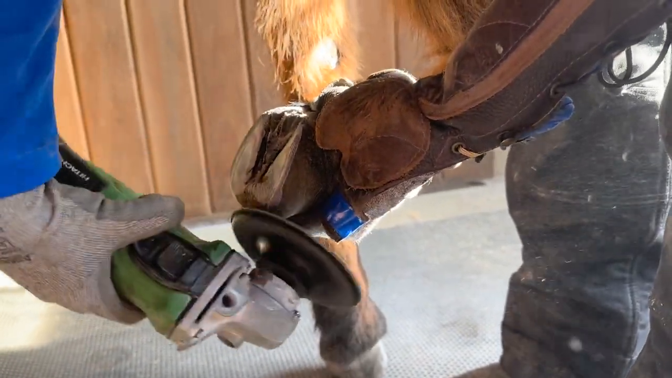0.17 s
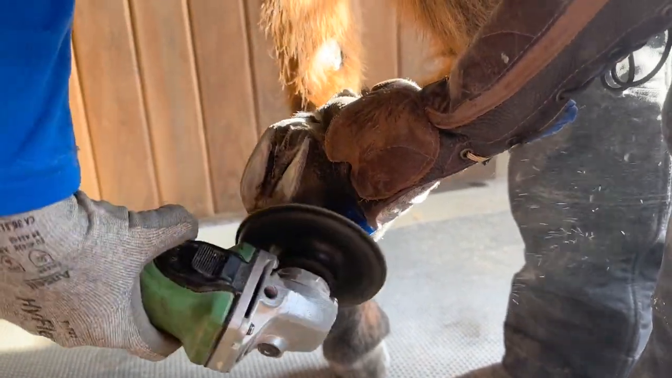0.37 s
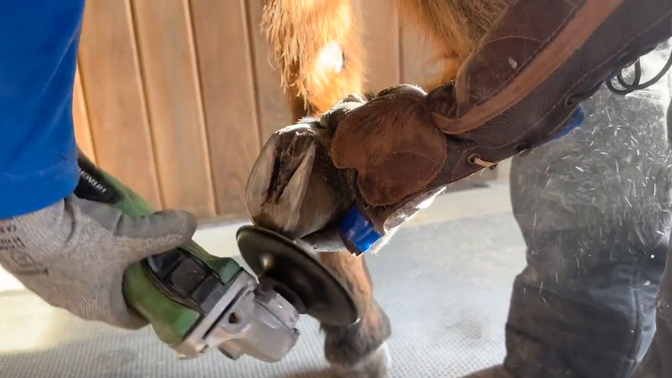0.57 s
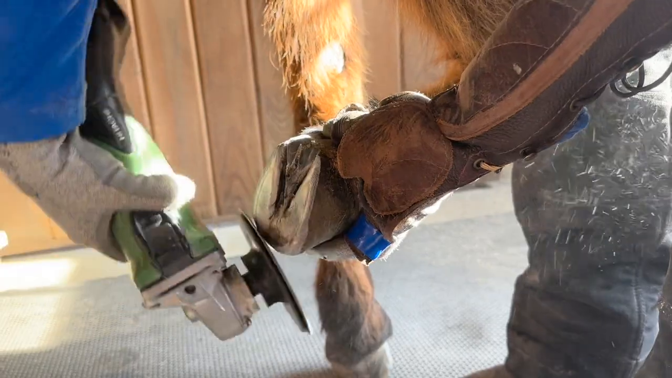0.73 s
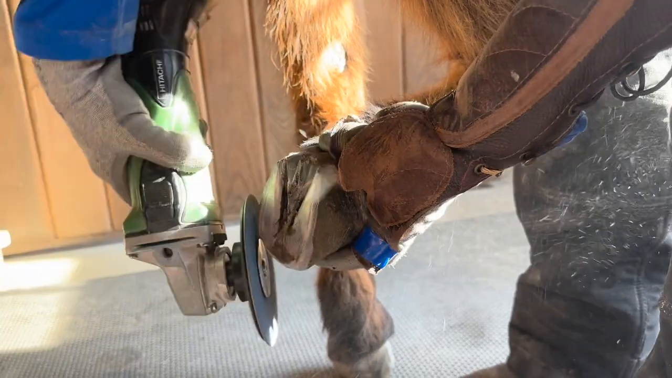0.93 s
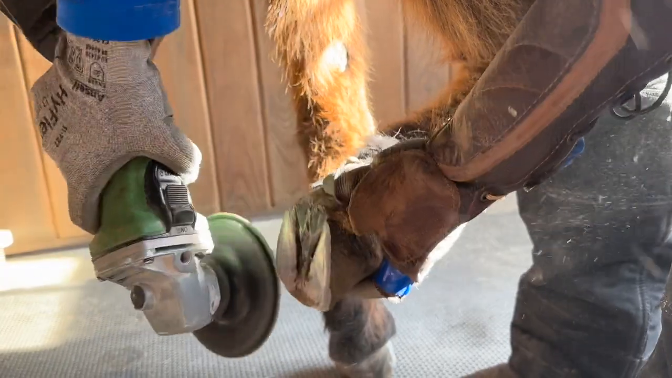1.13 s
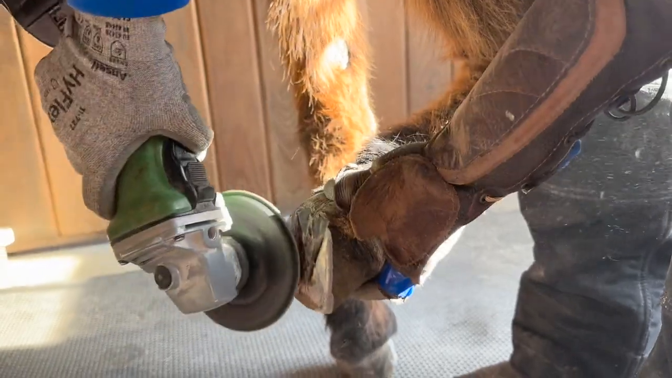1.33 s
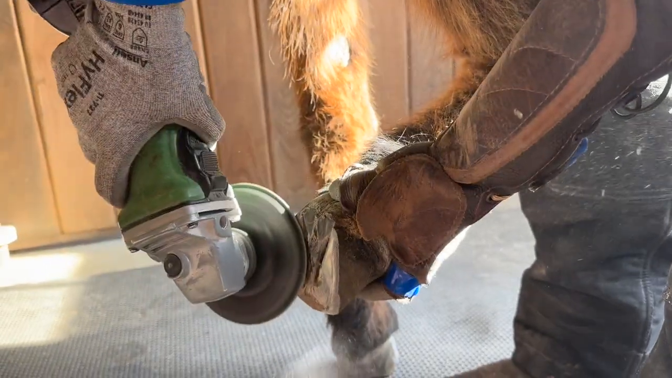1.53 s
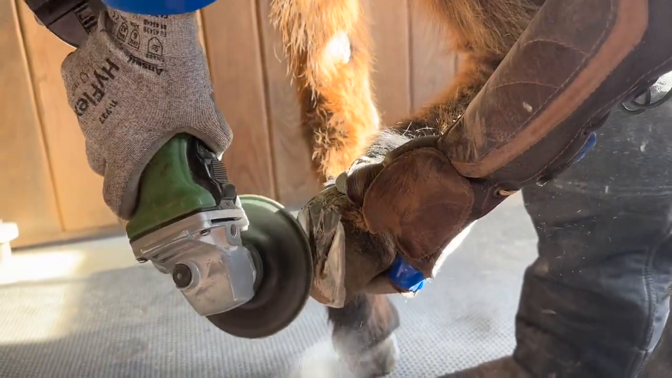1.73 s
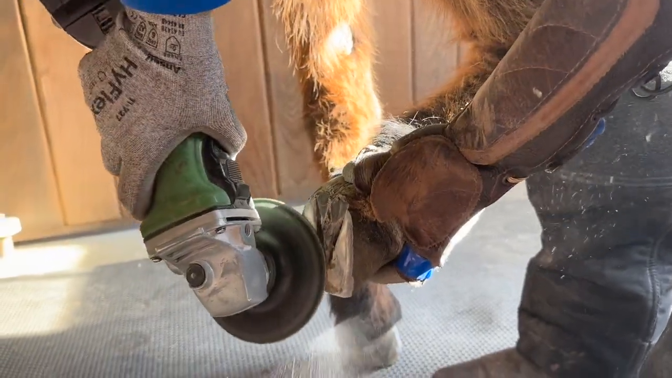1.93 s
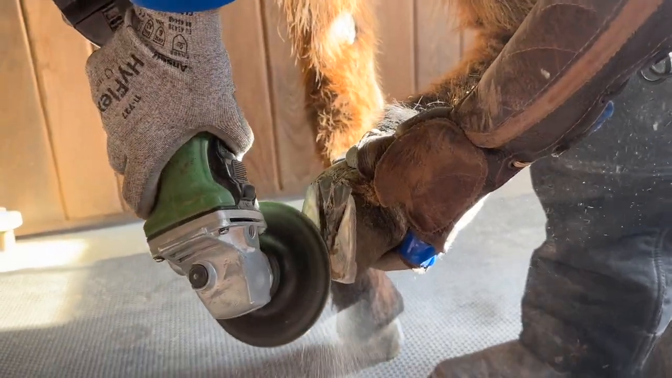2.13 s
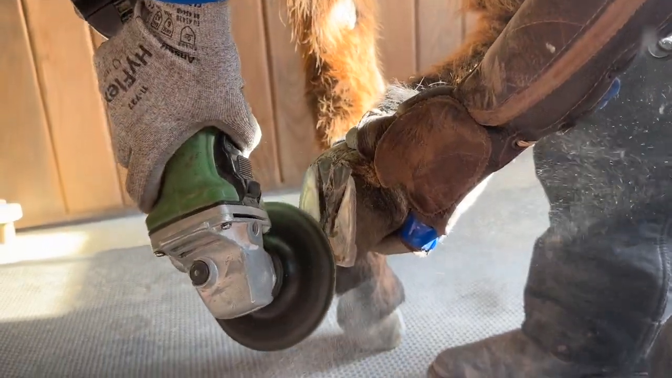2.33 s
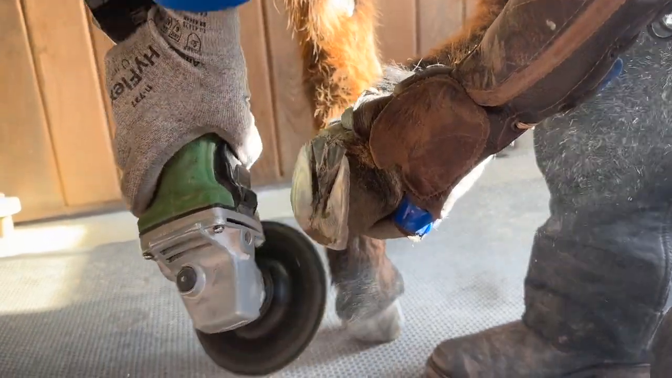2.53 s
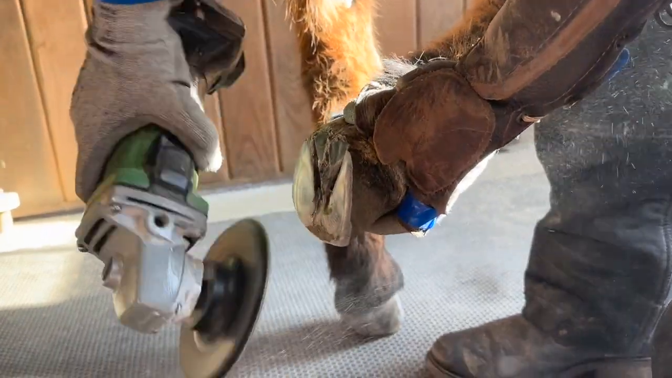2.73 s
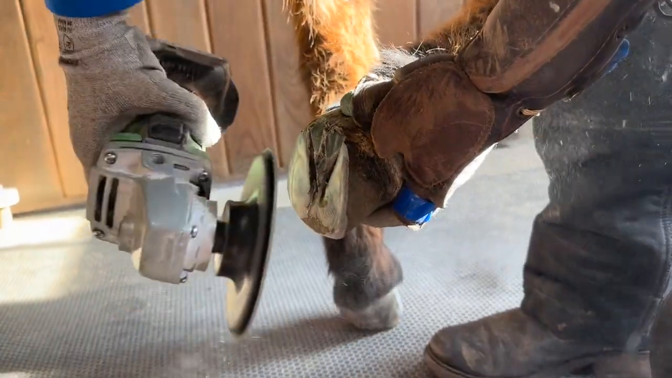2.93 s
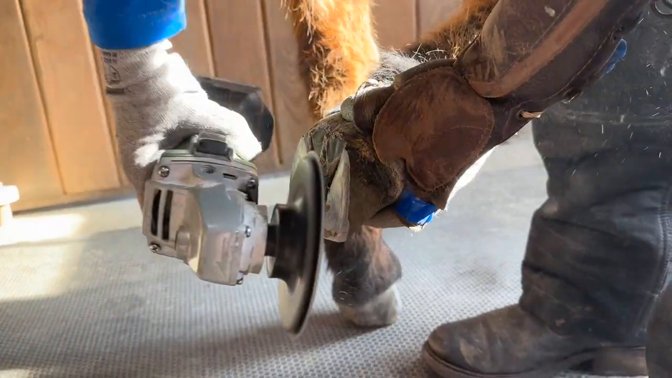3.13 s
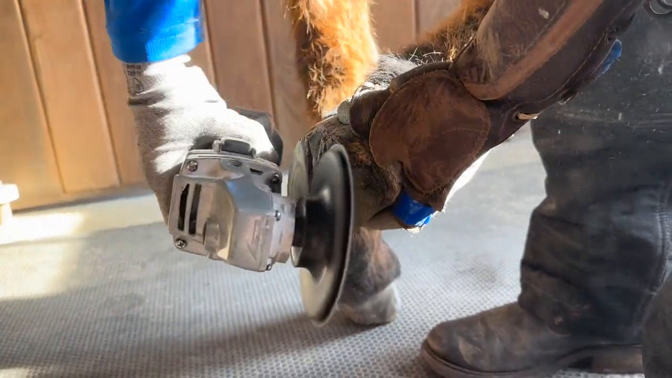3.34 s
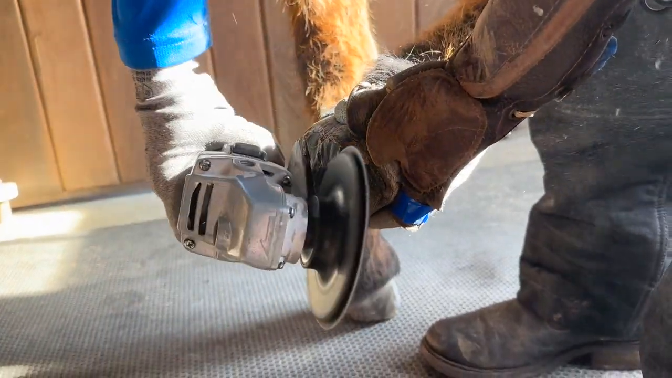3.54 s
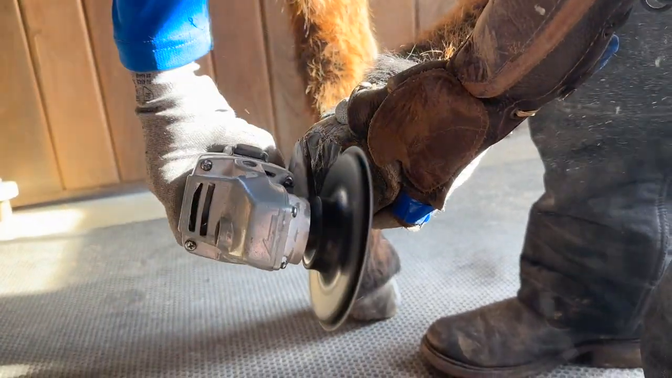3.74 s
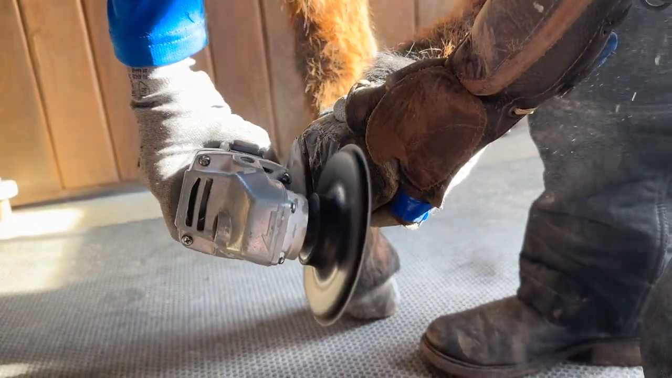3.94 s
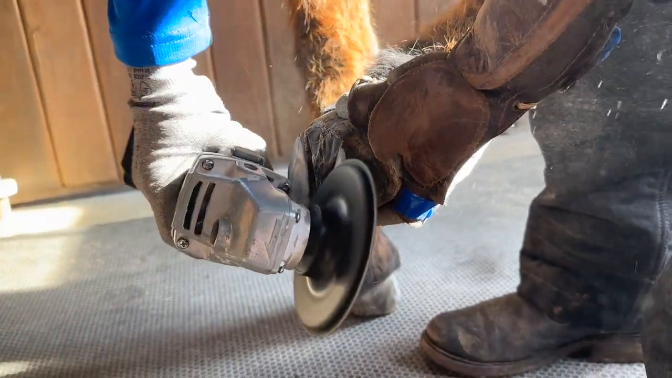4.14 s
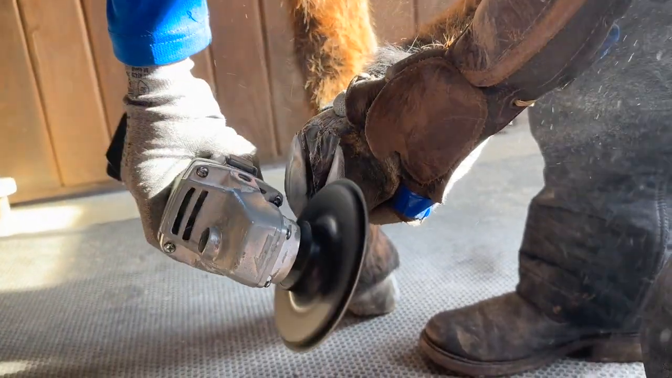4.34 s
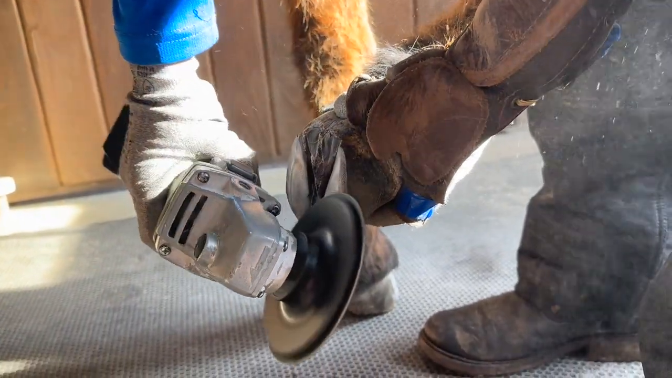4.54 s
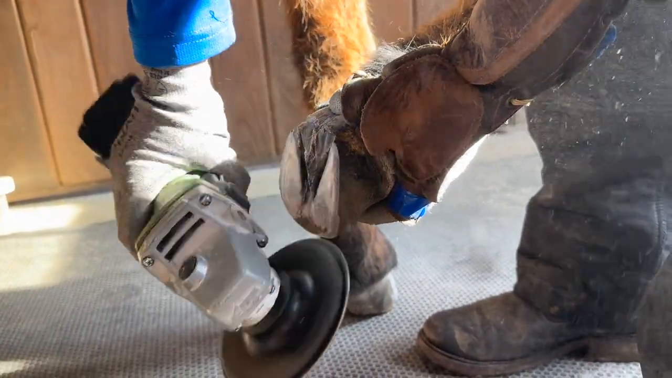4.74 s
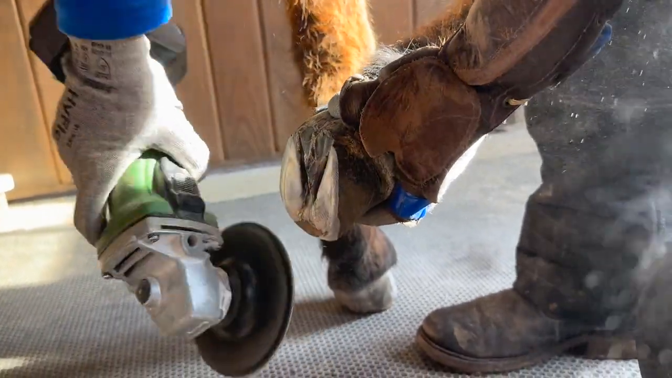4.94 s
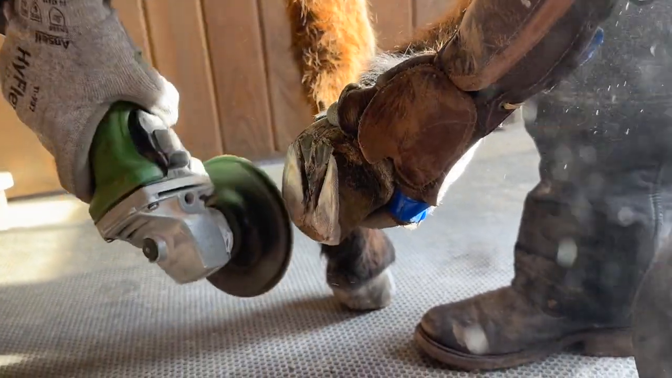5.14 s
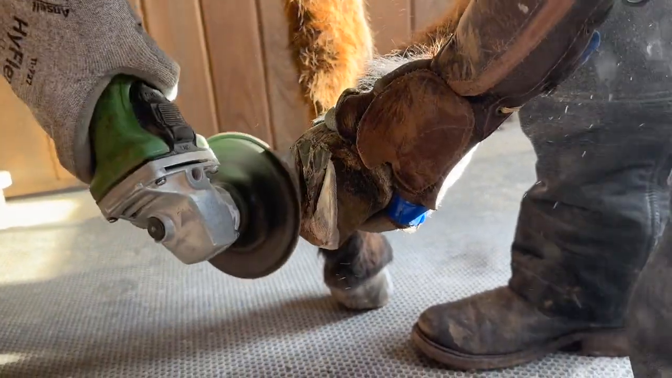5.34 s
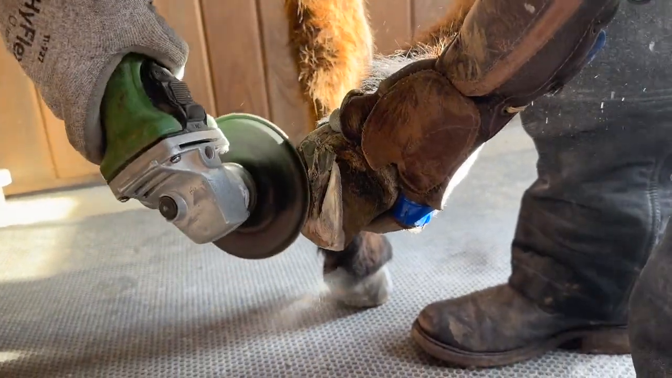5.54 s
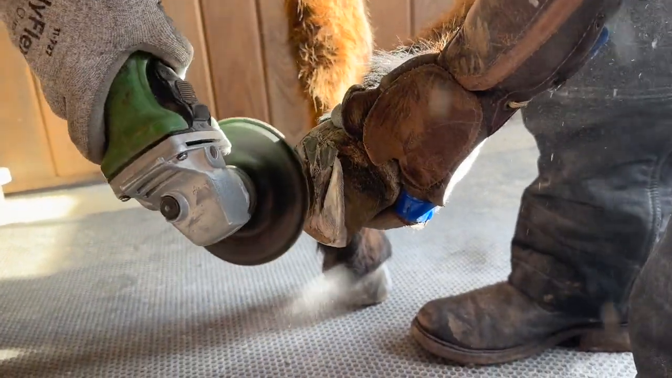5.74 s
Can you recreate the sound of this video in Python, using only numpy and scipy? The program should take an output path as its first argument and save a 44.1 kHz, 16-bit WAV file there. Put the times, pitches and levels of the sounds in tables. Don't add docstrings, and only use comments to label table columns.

```python
import sys
import numpy as np
from scipy import signal
from scipy.fft import rfft, irfft, next_fast_len
from scipy.io import wavfile
from scipy.ndimage import uniform_filter1d, map_coordinates

SR = 44100
rng = np.random.default_rng(int(sys.argv[2]) if len(sys.argv) > 2 else 0)


def volts(x):
    e = np.asarray(x, float) / 20
    return 10 ** e


def bounce(signal):
    frames = np.transpose(np.atleast_2d(signal))
    limited = np.clip(frames, -1, 1)
    pcm = np.round(limited * 32767).astype(np.int16)
    wavfile.write(sys.argv[1], SR, pcm)


N = 259749

# time in seconds, turns per second in Hz.
SPINDLE_SPEED = [(0.0, 142.6), (0.36, 140.5), (0.53, 146.7), (0.73, 144), (0.9, 146.3), (1.06, 142.4),
                 (1.15, 153.1), (1.5, 154.8), (1.7, 142.8), (2.02, 132.8), (2.5, 128.1), (2.72, 150.3),
                 (3.5, 155.5), (3.95, 147.8), (4.27, 134.2), (4.72, 131.4), (5.4, 155.9), (5.84, 136.6)]
# time in seconds, level of the grit hiss in dB.
STROKES = [
    [(0.0, -26.5), (0.25, -26.5), (0.4, -32.5), (0.47, -29.5), (0.6, -25), (0.75, -30.5), (0.86, -26),
     (0.92, -28), (0.98, -46)],
    [(1.38, -50), (1.4, -44), (1.54, -29.5), (1.66, -30.5), (1.74, -34), (1.79, -26.5), (1.9, -29),
     (2.5, -23.5), (2.56, -49)],
    [(3.4, -54), (3.456, -27), (3.506, -40), (3.54, -28.5), (3.68, -28.5), (3.77, -38), (4.09, -28),
     (4.68, -24), (4.75, -38.5)],
    [(5.4, -89), (5.428, -24.5), (5.45, -32.5), (5.62, -30.5), (5.716, -29.5), (5.79, -27), (5.86, -24),
     (5.89, -36)],
]


def unit(x):
    return x / np.sqrt(np.mean(x ** 2) + 1e-20)


def along(points, hz):
    f, v = np.transpose(points)
    return np.interp(np.log(hz + 1), np.log(f + 1), v)


def curves(rows):
    s, *cols = np.transpose(rows)
    return [np.interp(np.arange(N) / SR, s, c) for c in cols]


def per_stroke(table, lifted=None):
    rows = []
    for stroke, row in zip(STROKES, table):
        off = row if lifted is None else [lifted] * len(row)
        start, end = stroke[0][0], stroke[-1][0]
        rows += [(start - .02, *off), (start + .03, *row)]
        rows += [(end - .05, *row), (end + .02, *off)]
    return curves(rows)


def wobble(rate):
    knots = rng.standard_normal(int(N * rate / SR) + 4)
    return map_coordinates(knots, [np.arange(N) * rate / SR])


def bump(s, length):
    return np.exp(-((np.arange(N) / SR - s) / length) ** 2)


def filtered(x, response):
    m = next_fast_len(N + SR // 4)
    return irfft(rfft(x, m) * response(np.fft.rfftfreq(m, 1 / SR)), m)[..., :N]


def modes(table):
    def response(f):
        total = 0
        for k, (c, w, db) in enumerate(table):
            total = total + (-1) ** k * volts(db) * 1j * f * w / (c * c - f * f + 1j * f * w)
        return total
    return response


def colour(spectrum):
    return lambda hz: volts(along(spectrum, hz))


def turns():
    return np.cumsum(curves(SPINDLE_SPEED)[0]) / SR


def grit(angle, wear_turns, loose, high_spot_db):
    cells = 256
    face = rng.standard_normal((400, cells))
    place = [angle / wear_turns % 399, angle % 1 * cells]
    profile = unit(map_coordinates(face, place, mode="grid-wrap"))
    loose = np.clip(loose, 0, 1)
    bite = volts(high_spot_db * np.cos(2 * np.pi * angle) + .5 * high_spot_db * wobble(300))
    return bite * (np.sqrt(1 - loose) * profile + np.sqrt(loose) * rng.standard_normal(N))


def singing(angle, orders, centre_hz, width_hz, skirt_db, scatter_db, blur, sings=()):
    step = 32
    coarse = np.minimum(np.arange(0, N + step, step), N - 1)
    order = np.arange(*orders)[:, None]
    order_hz = order * np.gradient(angle)[coarse] * SR

    def peak(hz):
        return 1 / (1 + ((order_hz - hz) / width_hz) ** 2)

    drift = uniform_filter1d(uniform_filter1d(rng.standard_normal((2, *order_hz.shape)), size=110), size=110)
    flutter = uniform_filter1d(rng.standard_normal((2, *order_hz.shape)), size=7)
    gain = (peak(centre_hz[coarse]) + volts(skirt_db)) * volts(scatter_db * unit(drift[0]))
    gain = gain / np.sqrt(np.sum(gain ** 2, 0) / 2 * (1 + 2 * blur ** 2))
    for s, length, hz, db in sings:
        swell = np.exp(-((coarse / SR - s) / length) ** 2)
        gain = gain + volts(db) * swell * peak(hz) ** 2.85
    steady_phase = np.exp(1j * (order ** 2 + 0.63 * unit(drift[1])))
    gain = gain * (steady_phase + blur * (unit(flutter[0]) + 1j * unit(flutter[1])))
    spin, tone = np.exp(2j * np.pi * angle), 0
    for row in gain[::-1]:
        tone = tone * spin + np.repeat(row, step)[:N]
    return (tone * spin ** orders[0]).real


def grinding(angle):
    # frequency in Hz, density in dB per Hz.
    hiss_spectrum = [(2200, -26.5), (3700, -10), (4200, -5), (5400, -7.5), (6500, -6.5), (7200, -1),
                     (8100, 0.5), (9900, -2.5), (11300, 4.5), (12700, -6.5), (15000, -9.5), (15900, -15.5)]
    # disc, hoof wall, sole in dB.
    shake = [(-5.5, -18.5, -28.5), (-3.5, -4.5, -9.5), (-4.5, -6, -13.5), (-5, -4, -8.5)]
    # disc, hoof wall, sole in Hz.
    resonance = [(2750, 1550, 640), (2830, 1750, 1250), (2700, 2060, 1160), (2856, 2180, 1100)]
    # time in seconds, length in seconds, frequency in Hz, level against the part in dB.
    disc_sings = [(0.05, 0.077, 3050, -3), (0.2, .12, 2320, -8), (0.22, 0.24, 3260, -1),
                  (0.16, 0.12, 3060, 7), (0.305, 0.1, 2722, 8), (0.48, 0.082, 2830, 12.5),
                  (0.62, 0.16, 3090, 3.5), (0.65, 0.071, 3590, -1), (0.848, 0.11, 2560, 1.5),
                  (1.69, 0.056, 2612, 10.5), (2.357, 0.11, 3150, -3), (3.46, .03, 2700, 1),
                  (3.6, 0.11, 2750, 2.5), (3.84, .03, 2688, 1), (3.996, .08, 2710, 2.5),
                  (4.258, 0.044, 2780, 2.5), (4.55, 0.04, 2795, -2), (4.65, 0.045, 3100, 5),
                  (5.7, 0.037, 2600, 6), (5.845, .05, 2700, 5)]
    wall_sings = [(0.3, 0.17, 1540, 5.7), (0.55, 0.063, 2110, 14), (0.7, 0.1, 1570, 5.7),
                  (1.73, 0.084, 2030, 11), (1.97, 0.063, 2017, 9.8), (2.25, 0.17, 1884, 10.7),
                  (2.42, 0.055, 2069, 9.5), (3.46, 0.032, 2080, 1.5), (3.64, 0.081, 1802, 2),
                  (4.15, 0.18, 2010, 2.9), (4.48, 0.18, 2000, 6.5), (5.61, 0.037, 1797, 7),
                  (5.7, 0.043, 1980, 4.1), (5.81, 0.036, 2012, 7), (2.15, 0.25, 1449, 1.2),
                  (5.76, .08, 1460, 2.2)]
    sole_sings = [(0.9, 0.11, 520, 10), (1.64, 0.1, 920, 11), (1.83, .06, 1250, 1), (1.85, 0.06, 900, 6),
                  (2.07, 0.17, 1220, 5), (2.28, 0.077, 1204, 2), (3.64, 0.042, 1220, 1),
                  (3.64, 0.078, 610, -8), (4.16, 0.08, 564, -4), (4.1, 0.042, 1300, -5),
                  (4.57, 0.038, 1200, -2), (5.61, 0.082, 900, 9.5), (5.6, 0.059, 1100, 8.5),
                  (5.82, 0.029, 570, -0.5), (1.6, 0.31, 450, -5.5), (2.025, 0.11, 910, 0.5),
                  (5.6, 0.25, 494, -2.5), (4.47, 0.2, 464, -7)]
    # frequency in Hz, gain in
    # dB.
    body_colour = [(300, -11), (500, 2), (2100, -2.5), (2270, -7.5), (2450, 0), (2750, -4), (2950, -2.5),
                   (3650, 6), (4000, -7.5)]
    # time in seconds, level change in dB, length in seconds.
    skips = [(1.404, 16.5, 0.0083), (1.444, 7, 0.0075), (1.463, -14, 0.008), (2.521, 6, 0.017),
             (3.842, 6, 0.011), (3.869, -7, 0.015), (3.908, 4.5, 0.014), (3.952, -5.5, 0.0085),
             (3.962, 4.5, 0.0096), (4.384, -1.5, 0.054), (4.673, 2, 0.023)]

    rows = []
    for stroke in STROKES:
        rows += [(stroke[0][0] - .02, -75), *stroke, (stroke[-1][0] + .02, -75)]
    hiss_db, = curves(rows)
    disc_db, wall_db, sole_db = per_stroke(shake)
    disc_hz, wall_hz, sole_hz = per_stroke(resonance)
    hiss = unit(filtered(grit(angle, wear_turns=9, loose=0.42, high_spot_db=2), colour(hiss_spectrum)))
    disc = singing(angle, (16, 29), disc_hz, width_hz=130, skirt_db=-15, scatter_db=2.2, blur=.27,
                   sings=disc_sings)
    wall = singing(angle, (11, 17), wall_hz, width_hz=140, skirt_db=-11, scatter_db=2.5, blur=.1,
                   sings=wall_sings)
    sole = singing(angle, (3, 11), sole_hz, width_hz=150, skirt_db=-10, scatter_db=2, blur=.07,
                   sings=sole_sings)
    body = volts(disc_db + 4.0) * disc + volts(wall_db - 3.7) * wall + volts(sole_db) * sole
    for s, db, length in skips:
        hiss_db = hiss_db + db * bump(s, length)
    return volts(hiss_db + 0.57 * wobble(60)) * (volts(5.5) * hiss + filtered(body, colour(body_colour)))


def hum(angle, level_db):
    overtones = 0
    for k, db in ((2, -12), (3, -5), (6, -6)):
        overtones = overtones + volts(db + 1.2 * wobble(2.75)) * np.sin(2 * np.pi * k * angle)
    return volts(level_db + 0.5) * np.sin(2 * np.pi * angle) + volts(-50.0) * overtones


def gear(angle, level_db, ring_hz):
    # frequency in Hz, width in Hz, level in dB.
    housing_modes = [(1634, 160, -4.5), (3200, 117, -2), (5230, 1200, -2), (6730, 870, -2.5),
                     (10280, 4000, 0.5), (12000, 8100, -4.5)]
    # time in seconds, peak in dB.
    hard_clacks = [
        (1.221, -30),
        (1.3954, -33),
        (2.648, -29),
        (2.769, -29),
        (3.2784, -33),
        (5.0818, -31),
        (5.3295, -33),
        (5.4257, -32.5),
    ]
    chance = rng.standard_normal((int(angle[-1]), 2))
    flight_turns = np.clip(2.3 + .6 * chance[:, 0], 1, 4)
    at = np.searchsorted(angle, np.cumsum(flight_turns))
    kicks = np.zeros(N + 1)
    kicks[at] = volts(0.83 * chance[:, 1])
    for s, db in hard_clacks:
        kicks[round((s - .011) * SR):round((s + .008) * SR)] = 0
        kicks[round(s * SR)] = volts(db + 35)
    t = np.arange(900) / SR
    decay = volts(-60 * t / .0105) * (1 - np.exp(-t / .0006))
    burst = signal.fftconvolve(kicks[:N], decay)[:N]
    housing = unit(filtered((burst + 0.1) * rng.standard_normal(N), modes(housing_modes)))
    slow = filtered((burst + 0.35) * rng.standard_normal((2, N)), lambda hz: 1 / (1 + 1j * hz / 70))
    phase = 2 * np.pi * np.cumsum(ring_hz) / SR
    case = unit(slow[0] * np.cos(phase) + slow[1] * np.sin(phase))
    return volts(level_db) * (volts(2.5) * housing + volts(-4.0) * case)


def fan(level_db):
    # frequency in Hz, density in dB per Hz.
    air_spectrum = [(50, -44), (170, -16.5), (295, -4.5), (720, 2.5), (920, 0), (1350, 1), (1680, 0.5),
                    (2000, -2.5), (3100, 2), (5700, -9), (7800, -2), (9800, -7), (13200, -13),
                    (15900, -2.5)]
    air = unit(filtered(rng.standard_normal(N), colour(air_spectrum)))
    return volts(level_db + 3.5 + 1.1 * wobble(14)) * air


def duct(level_db):
    # frequency in Hz, width in Hz, level in dB.
    duct_modes = [(1590, 100, 4), (920, 62, -8.5)]
    return volts(level_db + 1.2 * wobble(12)) * unit(filtered(rng.standard_normal(N), modes(duct_modes)))


def rumble():
    # frequency in Hz, density in dB per Hz.
    low_spectrum = [(15, -45), (30, -26), (55, -9), (100, -3.5), (140, -11), (220, -7.5), (400, -70)]
    # time in seconds, peak in dB, length in seconds.
    puffs = [(1.196, -70, 0.29), (1.4, -64, 0.062), (1.801, -62, 0.062), (2.2, -63, 0.27),
             (2.495, -49.5, 0.068), (2.657, -63, 0.081), (3.102, -69, 0.66), (3.448, -53, 0.046),
             (3.551, -55, 0.055), (4.0, -69, 0.41), (4.518, -55, 0.061), (4.683, -35, 0.045),
             (5.151, -66, 0.73), (5.88, -53, 0.039)]
    t = np.arange(N) / SR
    swell = volts(-85)
    for s, db, length in puffs:
        swell = swell + volts(db) * np.exp(-((t - s) / length) ** 2 * 3)
    return swell * volts(4.1 * wobble(24.88)) * unit(filtered(rng.standard_normal(N), colour(low_spectrum)))


def squeal(angle):
    # time in seconds, length in seconds, frequency in Hz, level in dB.
    rim_ring = (4.57, .085, 4900, -30)
    s, length, hz, db = rim_ring
    rim = singing(angle, (35, 40), np.full(N, hz), width_hz=130, skirt_db=-14, scatter_db=7, blur=0.18)
    return volts(db) * bump(s, length) * rim


def ports(x, lead, scatter, least):
    # frequency in Hz, left-right likeness from 0 to 1.
    likeness = [(60, .99), (300, .96), (1000, .91), (2000, .82), (3000, .78), (4100, .4), (5500, .62),
                (7600, .58), (8600, .85), (10300, .95), (10900, .9995), (11700, .9995), (12800, .8),
                (13900, .9998), (15000, .9998)]
    # frequency in Hz, left minus right in dB.
    balance = [(60, 0), (500, 1.5), (1600, -1), (2700, 2.5), (4500, 0), (5700, 5), (6600, 2.5), (7600, 4.5),
               (9000, 0), (16000, 0)]
    hz, t, z = signal.stft(x, SR, nperseg=512, noverlap=384)

    def wander(bins, frames):
        noise = rng.standard_normal(z.shape)
        return unit(uniform_filter1d(uniform_filter1d(noise, bins, 0), frames, 1))

    spread = np.maximum(scatter * np.sqrt(-np.log(along(likeness, hz)) / 2), least)[:, None]
    turn = along(lead, hz)[:, None] / 2 + spread * (.9 * wander(8, 70) + .45 * wander(3, 6))
    lean = along(balance, hz)[:, None] / 2
    pair = [z * volts(side * lean) * np.exp(1j * side * turn) for side in (1, -1)]
    return signal.istft(np.array(pair), SR, nperseg=512, noverlap=384)[1][:, :N]


def scene():
    # gear rattle, fan, spindle hum in dB.
    load_changes = [
        (-7, 2.5, -26),
        (3.5, 3.5, 1.5),
        (-1.5, 2, -0.5),
        (5, 5, -0.5),
    ]
    # time in seconds, gear case ring in Hz, air duct level in dB.
    tool_turning = [(0.0, 5620, -46), (0.95, 5470, -49), (1.1, 5703, -66), (1.85, 5610, -37),
                    (2.3, 5280, -54), (2.7, 5500, -44), (2.8, 5950, -44.5), (3.2, 5900, -43.5),
                    (3.28, 5350, -46), (4.65, 5570, -36), (5.0, 5730, -69), (5.35, 5535, -68),
                    (5.89, 5570, -51)]
    # frequency in Hz, lead of the left in radians.
    grinding_lead = [(0, 0), (1000, .5), (2100, .6), (3500, 1.7), (4100, 3.14), (4700, 5.7), (7400, 7.7),
                     (8100, 6.4), (10000, 4.3), (10950, 3.16), (11650, 3.12), (13000, 1.5), (13900, 0),
                     (15100, 0), (15600, -.65)]
    # frequency in Hz, lead of the left in radians.
    motor_lead = [(0, 0), (1720, 1.1), (2240, .8), (2760, 1.9), (3190, 2.2), (3960, 5.6), (4570, 6.5),
                  (7400, 7.8), (8270, 6.3), (10000, 4.3), (10950, 3.16), (11650, 3.12), (13000, 1.5),
                  (13900, 0), (15100, 0), (15600, -.65)]
    rattle_free_db, fan_free_db, hum_free_db = -37, -39.5, -52.5

    angle = turns()
    gear_db, fan_db, hum_db = per_stroke(load_changes, lifted=0)
    ring_hz, duct_db = curves(tool_turning)
    drag_hz = np.maximum(138.4 - curves(SPINDLE_SPEED)[0], 0)
    hum_db = hum_free_db + hum_db - 2 * drag_hz + 1.3 * wobble(4)
    steady = grinding(angle) + squeal(angle) + rumble() + hum(angle, hum_db)
    motor = gear(angle, rattle_free_db + gear_db + 1.034 * wobble(5.113), ring_hz)
    motor = motor + fan(fan_free_db + fan_db) + duct(duct_db)
    near = ports(steady, grinding_lead, scatter=1.1, least=0)
    return near + ports(motor, motor_lead, scatter=1.2, least=.16)


def roll_off(x):
    return signal.sosfilt(signal.butter(12, 16250, fs=SR, output="sos"), x)


def record(dry):
    mix = filtered(dry, lambda hz: hz < 15950)
    return roll_off(mix)


dry = scene()
out = record(dry)
bounce(out)
```